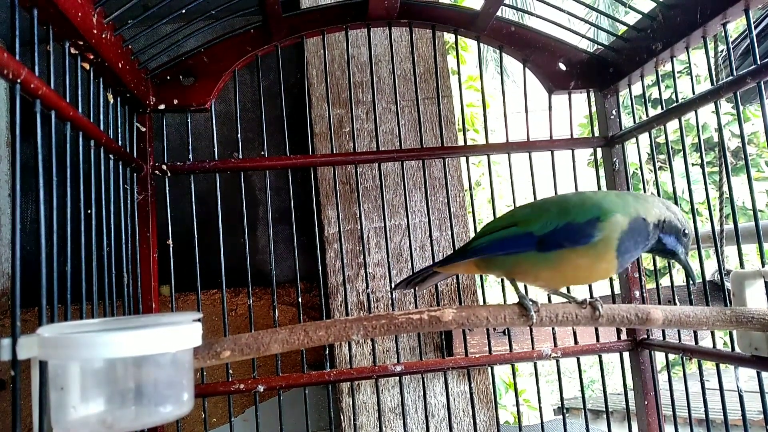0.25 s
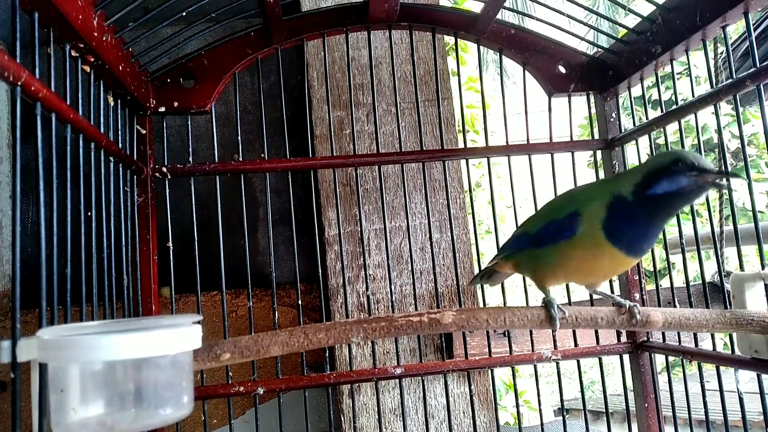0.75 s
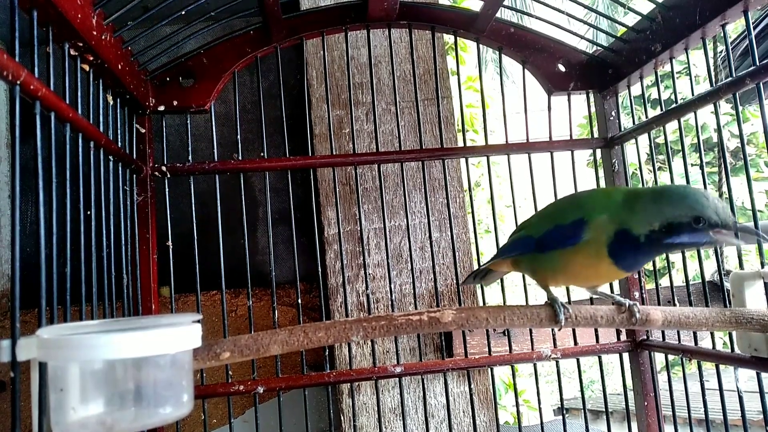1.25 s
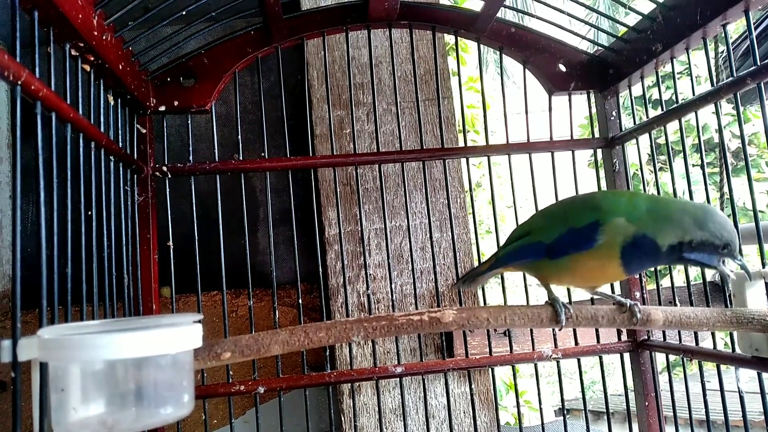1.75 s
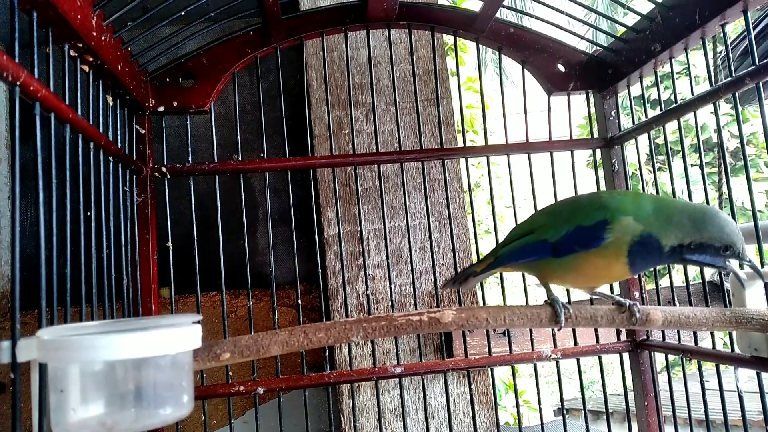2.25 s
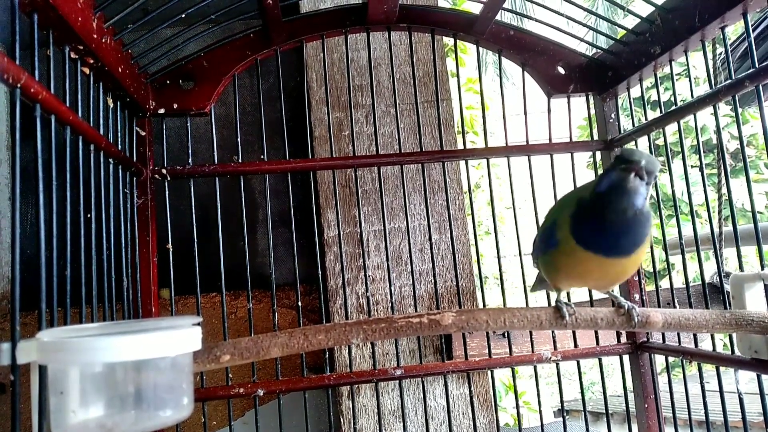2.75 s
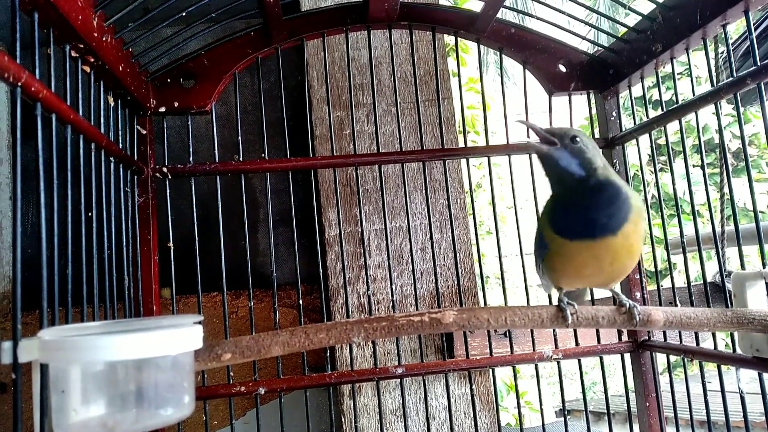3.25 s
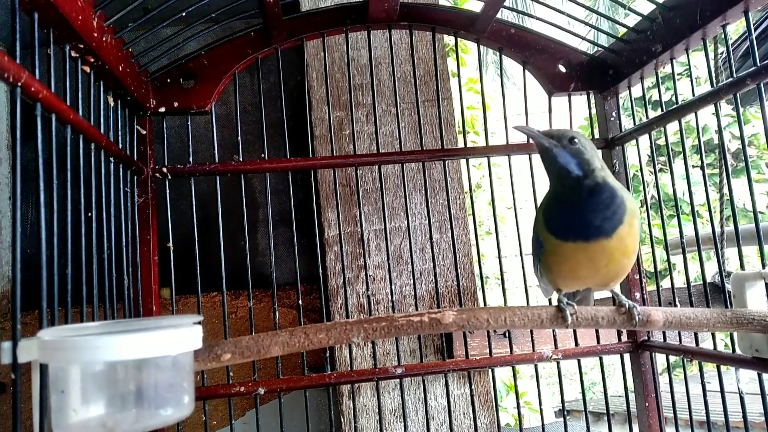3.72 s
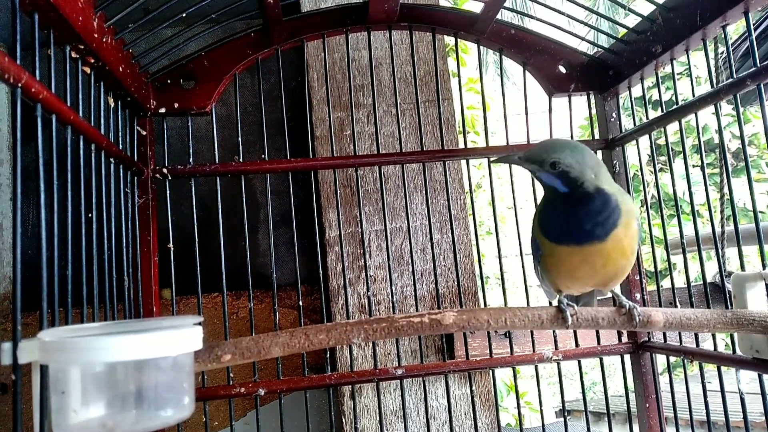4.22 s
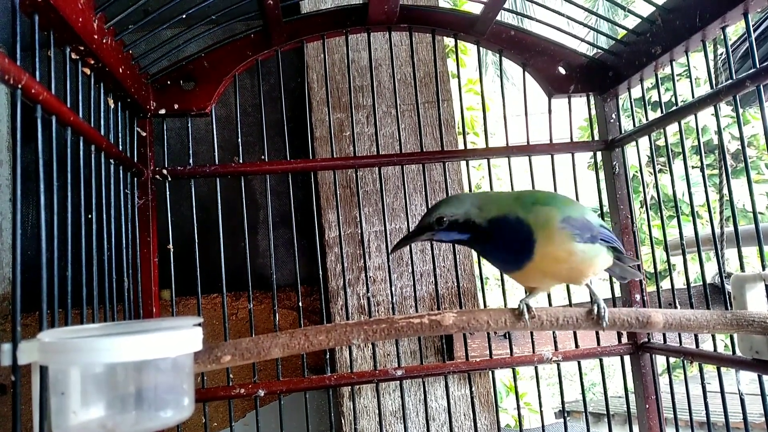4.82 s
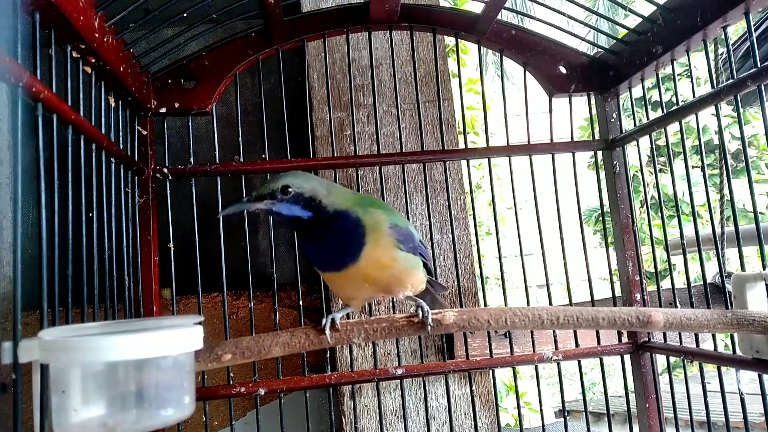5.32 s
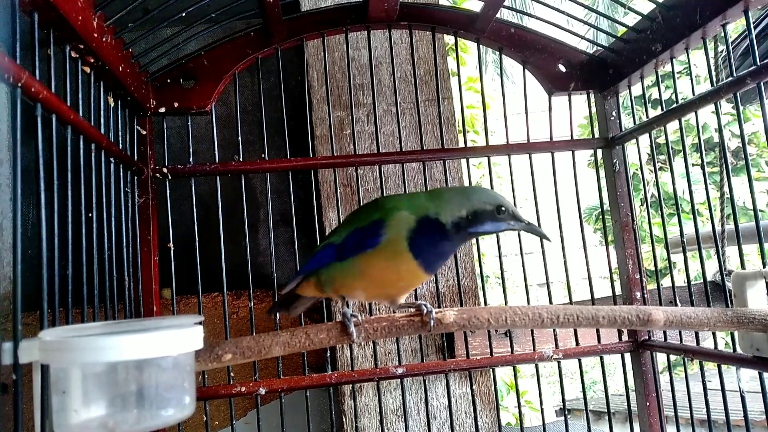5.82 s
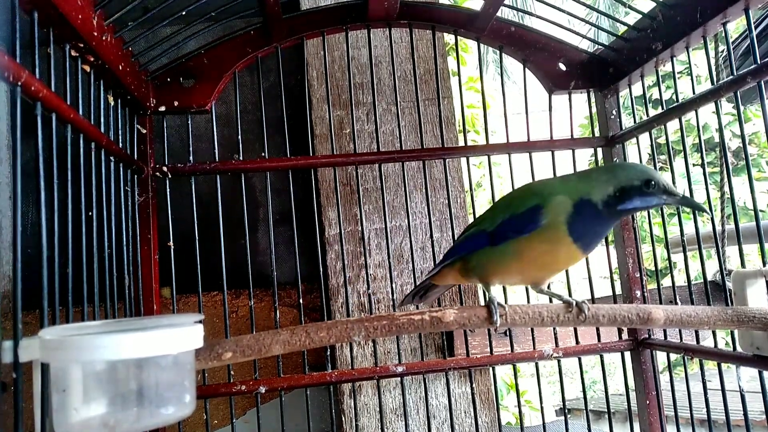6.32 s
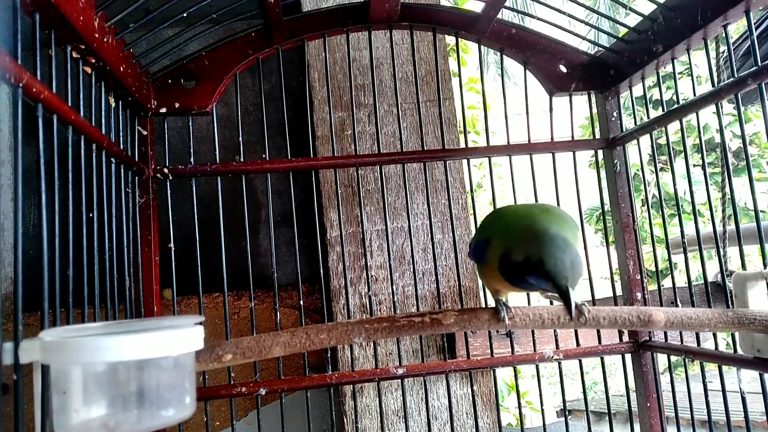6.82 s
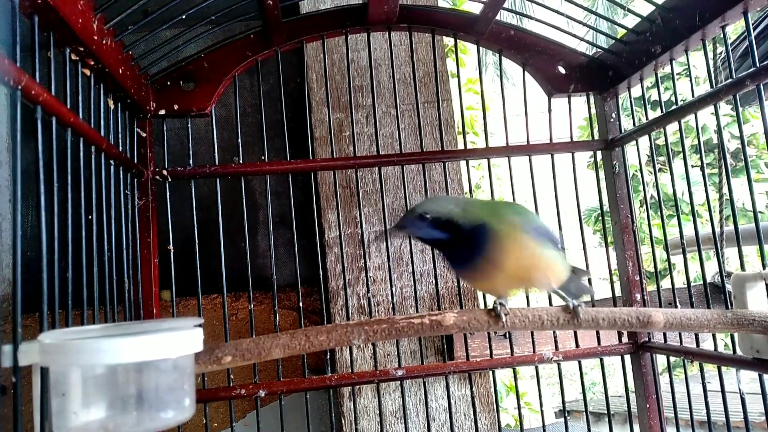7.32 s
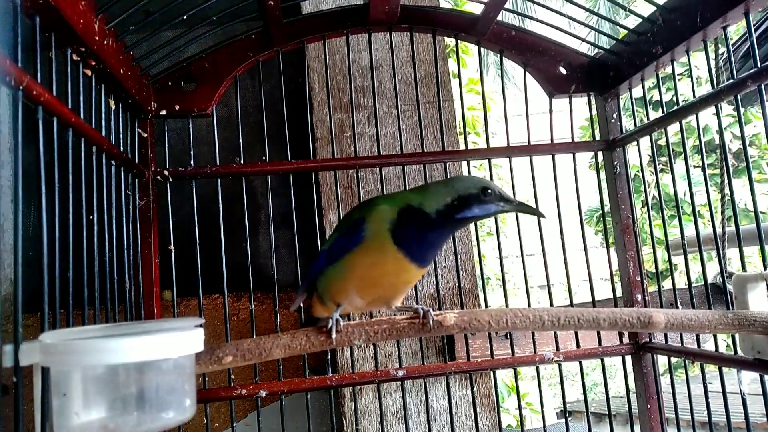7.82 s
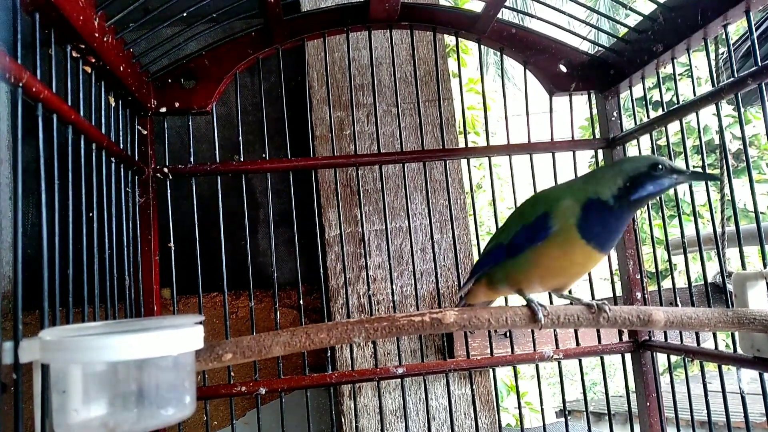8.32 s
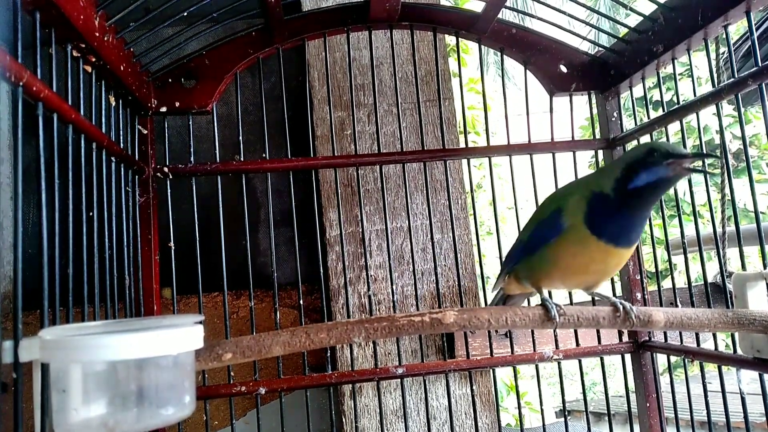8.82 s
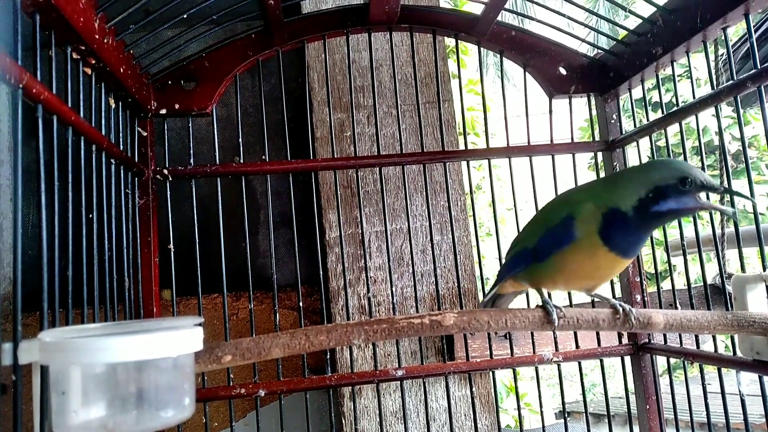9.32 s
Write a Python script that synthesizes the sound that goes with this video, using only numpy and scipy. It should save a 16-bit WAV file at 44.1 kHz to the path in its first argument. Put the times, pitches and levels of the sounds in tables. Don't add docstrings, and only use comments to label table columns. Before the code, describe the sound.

On a semi-enclosed porch, a phone close to a birdcage picks up rasping, buzzy chirps in quick succession, a neighbouring bird's purer whistles, then a quieter stretch of hopping feet, wooden taps, tiny metallic clinks and high dry insect ticks. Two hoarse squawks break in while a far bird warbles with blurred echoes. Traffic swells low, and a final burst of harsh chattering runs to the end.

```python
import sys
import numpy as np
from scipy import signal
from scipy.fft import rfft, irfft
from scipy.io import wavfile
from scipy.ndimage import uniform_filter1d

SR = 44100
rng = np.random.default_rng(int(sys.argv[2]) if len(sys.argv) > 2 else 0)


def master_out(mix):
    frames = np.transpose(np.atleast_2d(mix))
    ceiling = np.clip(frames, -1, 1)
    pcm = np.round(ceiling * 32767).astype(np.int16)
    wavfile.write(sys.argv[1], SR, pcm)


def voltage_ratio(level):
    return 10 ** (np.asarray(level, float) / 20)


N = 421596
TIME = np.arange(N) / SR

# start_s, length_s, level_db
SLOW = [(.98, 0.031, -15.5), (1.074, 0.042, -18), (1.152, 0.04, -17), (1.254, 0.044, -17),
        (1.338, .053, -19.5), (1.432, 0.035, -17)]
RISING = [(1.515, 0.048, -14.5), (1.578, 0.045, -12.5), (1.64, 0.051, -14.5), (1.722, 0.039, -13.5),
          (1.794, 0.037, -13.5), (1.864, 0.037, -14), (1.935, .032, -12), (2.011, 0.021, -10.5),
          (2.079, 0.025, -11.5)]
TURNING = [(2.137, 0.028, -14.5), (2.202, 0.03, -17), (9.005, .029, -14.5), (9.064, 0.044, -16.5)]
FAST = [(2.266, 0.03, -13.5), (2.333, 0.019, -14), (2.391, 0.026, -14), (2.453, .029, -14),
        (2.522, 0.024, -14), (2.586, .025, -14), (2.651, 0.025, -15), (2.716, 0.03, -13.5),
        (2.78, 0.026, -13), (2.844, 0.029, -14), (2.915, 0.03, -13), (2.975, 0.031, -13.5)]
CLOSING = [(3.049, 0.034, -11.5), (3.12, 0.065, -12), (3.195, 0.041, -12), (3.284, 0.03, -12.5),
           (9.12, 0.056, -14)]
AGAIN_FAST = [(8.685, 0.038, -15), (8.748, 0.029, -14), (8.82, 0.025, -16.5), (8.88, 0.033, -16.5),
              (8.943, 0.031, -16)]
AGAIN_RISING = [(9.197, 0.05, -16), (9.268, 0.047, -15.5), (9.342, 0.055, -16.5), (9.418, .039, -14),
                (9.5, 0.042, -15)]


def unit(x):
    return x / np.sqrt(np.mean(x ** 2))


def walk(rate):
    hold = max(int(SR / rate), 2)
    steps = np.repeat(rng.standard_normal(N // hold + 1), hold)
    return unit(uniform_filter1d(uniform_filter1d(steps, hold), hold)[:N])


def noise(points, size=N):
    hz, db = np.transpose(points)
    shape_db = np.interp(np.log(np.fft.rfftfreq(size, 1 / SR) + 1), np.log(hz), db, -99, -99)
    return unit(irfft(rfft(rng.standard_normal(size)) * voltage_ratio(shape_db), size))


def tone(hz, wobble, rate):
    shaken_hz = hz * (1 + wobble * np.clip(walk(rate), -1.7, 1.7))
    return np.sqrt(2) * np.sin(2 * np.pi * np.cumsum(shaken_hz) / SR)


def played(tables, edge_s):
    s, *columns = np.vstack(tables).T
    gate = sum(1. * (TIME >= rows[0][0]) * (TIME < rows[-1][0]) for rows in tables)
    soft_gate = uniform_filter1d(np.minimum(gate, 1), int(edge_s * SR) + 1)
    return [np.interp(TIME, s, column) for column in columns] + [soft_gate]


def notes(rows, peak, start_db, end_db, settle):
    shares = np.array(sorted([0, peak, settle, 1]))
    phrases = []
    for start, length, first_hz, last_hz, db in rows:
        hz = np.interp(shares, [0, settle], [first_hz, last_hz])
        level_db = db + np.interp(shares, [0, peak, 1], [start_db, 0, end_db])
        phrases.append(np.transpose([start + shares * length, hz, level_db]))
    return phrases


def rings(events, cycles, rise_s, length_s=0.22):
    out, t = np.zeros(N + SR), np.arange(int(length_s * SR)) / SR
    for start, hz, db, t60, rough in events:
        grain = uniform_filter1d(rng.standard_normal(len(t)), max(int(SR / hz * cycles), 2))
        grain = uniform_filter1d(grain, max(int(SR / hz * cycles / 2), 2))
        decay = np.minimum(t / rise_s, 1) * voltage_ratio(db - 60 * t / t60)
        shape = decay * ((1 - rough) + rough * unit(grain))
        out[int(start * SR):][:len(t)] += shape * np.sin(2 * np.pi * hz * t)
    return out[:N]


def space(x, near_ms, near_db, t60, tail_db, pan_db, turn=0.73, lag=5):
    t = np.arange(int(.6 * SR)) / SR
    chance = rng.standard_normal((3, 2, len(t)))
    near = chance[:2] * np.exp(-t * 1000 / near_ms)
    near = voltage_ratio(near_db) * near / np.linalg.norm(near, axis=2, keepdims=True)
    tail = chance[2] * voltage_ratio(-60 * t / t60) * np.minimum(t / 0.014, 1)
    still = voltage_ratio(tail_db) * tail / np.linalg.norm(tail[0])
    still[[0, 1], [0, int(lag)]] += 1
    angle = turn * walk(5)
    paths = zip((x, x * np.cos(angle), x * np.sin(angle)), (still, *near))
    heard = sum(signal.fftconvolve(part[None], path, axes=1)[:, :N] for part, path in paths)
    panned = heard * voltage_ratio(np.array([[.5], [-.5]]) * pan_db)
    return panned / np.sqrt(1 + voltage_ratio(2 * near_db) + voltage_ratio(2 * tail_db))


def porch_air():
    # pitch_hz, level_db per Hz
    spectrum = [(150, -21), (250, -2), (638, -1.5), (1660, -12.5), (2600, -10), (4770, -16), (9230, -16),
                (11400, -20.5), (13500, -15), (15800, -32)]
    mid, side = rfft(noise(spectrum)), rfft(noise(spectrum))
    hz, out, swell = np.fft.rfftfreq(N, 1 / SR), 0, walk(1.75)
    for centre in 150 * 2. ** np.arange(7.):
        band = np.clip(1 - abs(np.log2((hz + 1) / centre)), 0, 1)
        apart = min(0.33 + centre / 1800, 1) * np.array([[1], [-1]])
        swell_db = 1.0 * swell + 1.3 * walk(5) + 2 * walk(12)
        out = out + voltage_ratio(swell_db) * irfft(band * (mid + apart * side), N)
    return voltage_ratio(-51) * unit(out)


def traffic():
    # start_s, level_db
    boom_course = [(0.0, -51), (0.16, -47), (1.54, -52.5), (3.8, -47.5), (3.86, -47), (4.07, -74),
                   (4.15, -45), (6.23, -55), (6.63, -45.5), (7.35, -48.5), (7.61, -37), (8.23, -42.5),
                   (8.44, -40.5), (9.56, -48.5)]
    # pitch_hz, width_hz, level_db
    room_modes = [(71.4, 24, -6.5), (100.4, 12.8, 4), (126, 8.2, 2), (55, 56, -35), (180.4, 121, -11.5)]
    # start_s, pitch_hz, level_db
    engine = [(7.45, 111.2, -50), (7.68, 112.9, -32.5), (7.85, 121.4, -42), (8.25, 126, -44),
              (8.5, 128.4, -32), (8.9, 125.4, -41.5), (9.25, 119, -45.5)]
    spectrum = 0
    for mode_hz, width_hz, db in room_modes:
        detuning = (np.fft.rfftfreq(N, 1 / SR) - mode_hz) / width_hz * 2
        spectrum = spectrum + voltage_ratio(db) / (1 + detuning ** 2) * rfft(rng.standard_normal(N))
    boom = unit(irfft(spectrum, N)) * voltage_ratio(np.interp(TIME, *np.transpose(boom_course)) + 2.2 * walk(9))
    hum_hz, hum_db, gate = played([engine], .05)
    boom += gate * voltage_ratio(hum_db) * tone(hum_hz, 0.02205, 13)
    return np.array([boom, np.roll(boom, 12)]) * voltage_ratio(np.array([[-1.5], [1.5]]))


def far_warbler():
    # start_s, length_s, first_hz, last_hz, level_db
    warble = [(0, 0.11, 3454, 3570, -35), (.16, 0.15, 3616, 2783, -38), (.415, 0.095, 3430, 3645, -33),
              (.51, 0.14, 3580, 3720, -42.5), (5.55, 0.05, 3120, 2770, -51), (5.78, .12, 2445, 3230, -45),
              (6.28, .1, 2816, 2610, -46.5), (6.42, 0.071, 2720, 3190, -44.5),
              (6.78, 0.11, 3507, 3570, -35), (6.87, 0.08, 3480, 2810, -31),
              (7.16, 0.076, 3070, 3256, -33.5), (7.25, 0.091, 3470, 3860, -34),
              (7.33, 0.11, 3940, 3350, -35.5), (7.45, 0.12, 2970, 2803, -36),
              (7.62, 0.065, 3090, 3410, -33.5), (7.69, 0.11, 3500, 3950, -32),
              (7.79, 0.058, 3890, 2820, -38), (8, 0.073, 3190, 3240, -34), (8.11, 0.044, 2910, 2630, -36),
              (8.26, 0.15, 3067, 3453, -34), (8.4, 0.076, 3410, 2952, -34)]
    hz, db, gate = played(notes(warble, peak=0.22, start_db=-2.5, end_db=-13, settle=0.46), 0.005)
    dry = gate * voltage_ratio(db + 2.5 * walk(40)) * tone(hz, .019, 250)
    return space(dry, 23, 1.2, 0.67, 0.9, 0.36, turn=1.62)


def insect():
    # start_s, peak_db
    ticks = [(0.149, -37), (0.359, -36), (0.5691, -34), (3.4411, -42), (3.6431, -42), (3.8397, -36),
             (4.0412, -41), (4.2482, -37), (4.4583, -40), (4.6663, -37), (4.871, -39), (5.0814, -36),
             (5.2859, -38), (5.4934, -35), (5.692, -37), (5.911, -37), (6.1235, -38.5), (6.335, -41),
             (6.5415, -35), (6.7501, -36), (7.163, -33), (7.3736, -31.5), (7.5867, -36), (7.7847, -34),
             (7.9922, -36), (8.2092, -37), (8.4208, -37)]
    # pitch_hz, level_db
    wing = [(13600, 6.5), (14600, -3)]
    buzz = 0.85 + 0.15 * np.sin(2 * np.pi * 190 * TIME)
    events = [(s - .006, hz, db + wing_db + 2, .12, .8) for s, db in ticks for hz, wing_db in wing]
    return space(buzz * rings(events, 11, .014), 2.2, 13.0, 0.16, -42, 4.6, turn=2.2)


def perch_knocks():
    # (relative to the peak, at 2.5, 5 and 9 kHz)
    knocks = [(0.15, -40, 1510, -5), (0.352, -43.5, 2840, 11), (0.474, -30, 860, -7.5),
              (3.414, -33, 2050, -6), (3.545, -31.5, 1360, -11), (3.579, -31.5, 617, -13),
              (3.765, -36.5, 315, -8), (3.983, -39, 370, -20), (4.311, -32.5, 945, -8),
              (4.629, -35, 843, -14), (5.049, -32.5, 630, -13), (5.078, -30, 928, -3.5),
              (5.108, -32.5, 2596, -4.5), (5.14, -47, 2460, -20), (5.443, -39, 1180, -2.5),
              (5.466, -35, 359, -5), (5.474, -37, 2220, -15), (5.633, -40, 1895, -4),
              (5.655, -40, 1990, -8), (5.619, -36, 615, 1.5), (5.674, -36, 393, -24),
              (5.814, -35.5, 657, -1), (5.848, -36, 905, -4), (5.972, -30, 363, -25),
              (6.221, -32.5, 594, -15), (6.331, -34, 399, 5), (6.539, -22, 2870, -16),
              (7.19, -40, 1540, 6.5), (7.284, -38, 2220, 2), (7.384, -35.5, 910, -0.5),
              (7.776, -29, 1305, -2), (7.862, -35, 900, 3), (7.934, -28.5, 2240, -6),
              (8.054, -35.5, 500, 7.5), (8.16, -36, 1305, -2)]
    main = [(s, hz, db - 1, .1, .6) for s, db, hz, _ in knocks]
    body = [(s, 1100, db - 5, .09, .9) for s, db, *_ in knocks]
    scrapes = [(s, hz, db + up_db - 4.5, .09, 1) for s, db, _, up_db in knocks for hz in (2500, 5000, 9000)]
    return rings(main + body, .8, .003) + rings(scrapes, 1.05, 0.0053)


def bright_clinks():
    # start_s, peak_db, upper_modes_db
    clinks = [(3.4141, -60, -44), (3.645, -33, -1), (4.0412, -24.5, -10), (4.8788, -39, -26.5),
              (5.2859, -47, -24), (5.694, -44, -14), (5.9105, -31.5, -6.5), (6.3305, -71, -33)]
    # pitch_hz, level_db, t60_s
    clink_modes = [(5685, 9, 0.03), (6960, 4, 0.064), (7500, -7, 0.13), (11100, -4, 0.066)]
    events = [(s, hz, db + mode_db + (hz > 6000) * up_db, t60, .75)
              for s, db, up_db in clinks for hz, mode_db, t60 in clink_modes]
    return rings(events, 12, .005)


def knocks_and_clinks():
    return space(perch_knocks() + bright_clinks(), 1.6, 0.54, 0.17, -2.3, 0.47)


def neighbour_whistles():
    # start_s, length_s, first_hz, last_hz, level_db
    whistles = [(.535, 0.1, 2510, 2508, -35.5), (1.02, 0.061, 2557, 2539, -29),
                (1.08, 0.082, 1804, 1943, -14.5), (1.2, 0.069, 1950, 1900, -10.5),
                (1.322, 0.081, 1916, 1848, -14.5), (1.5, 0.08, 1874, 1776, -15.5)]
    hz, db, gate = played(notes(whistles, peak=0.69, start_db=-9.5, end_db=-9.5, settle=.9), 0.02)
    dry = gate * voltage_ratio(db - 1.5 + 1.5 * walk(70)) * tone(hz, .008, 150)
    return space(dry, 3, -7, .2, -13, 6)


def voice(throat_hz, low_hz, low_db, treble_db, treble, wobble, rasp_db, octave_db):
    # pitch_hz, level_db per Hz
    rasp = [(530, -61), (900, -31.5), (1280, -26), (1610, -40.5), (1850, -10.5), (3020, 2), (4330, -1.5),
            (5200, -21), (6760, -33), (11400, -120)]
    flutter = unit(voltage_ratio(1.2 * walk(350) + 1.8 * walk(1100) + 3 * tone(170, .2, 60)))
    upper = tone(throat_hz, wobble, 700) + voltage_ratio(-22) * tone(2 * throat_hz, wobble, 700)
    lower = voltage_ratio(low_db) * np.minimum(low_hz / 1700, 1) ** 4.5 * tone(low_hz, 1.3 * wobble, 610)
    lower += voltage_ratio(low_db + octave_db) * tone(2 * low_hz, wobble, 650)
    breath = voltage_ratio(rasp_db) * noise(rasp) + voltage_ratio(treble_db + 1.47 * walk(40)) * noise(treble)
    return flutter * (upper + lower) + np.sqrt(flutter) * breath


def slurs(crest):
    # start_s, length_s, level_db, dip_hz
    opening = [(0.651, 0.035, -18.5, 3074), (0.686, 0.047, -15, 2700), (0.733, 0.056, -16, 3354),
               (0.786, 0.058, -17, 2704), (0.837, 0.057, -16, 3142), (0.892, 0.052, -15, 2910),
               (8.532, .028, -21, 3645), (8.563, 0.065, -16, 2750), (8.623, 0.051, -15.5, 2605)]
    posture = (0, -10.5, -2, 0, -0.0843)
    rise_hz_per_s, top_hz, last_hz = 62000, 5138, 1951
    ends = [b[3] if b[0] - a[0] < .1 else last_hz for a, b in zip(opening, opening[1:])] + [last_hz]
    rows = []
    for (start, length, db, dip), end in zip(opening, ends):
        crest_hz = min(dip + rise_hz_per_s * crest * length, top_hz)
        rows.append((start, length, db, (dip, crest_hz, end), posture, True))
    return rows


def plunges(rows):
    # start_s, length_s, first_hz, last_hz, level_db
    hooks = [(3.15, 0.023, 1700, 1035, -30.5), (3.172, 0.025, 1020, 2353, -27),
             (8.55, .04, 1496, 1387, -28.5)]
    falls = [(s + length - .012, 0.018, 2103, 900, db - 22)
             for s, length, db, *_, slurred in rows if not slurred]
    phrases = notes(sorted(hooks + falls), peak=0.25, start_db=-11, end_db=-5.2, settle=0.76)
    hz, db, gate = played(phrases, 0.0038)
    return gate * voltage_ratio(db) * tone(hz, 0.01136, 600)


def song():
    # (top_hz of the lower voice, low_db, treble_db, pan_db (left minus right), wobble share)
    phrases = [(SLOW, (4150, 3900, 4120), (2640.5, -13, -0.5, 0, 0.22)), (RISING, (2850, 3100, 3500),
               (2440, -19, -9.5, 0.3, 0.1)), (TURNING, (4050, 3050, 3200), (2400, -22.5, -4, 0, 0.2654)),
               (FAST, (4450, 4330, 3900), (2261, -13, -9, 0, 0.1041)), (CLOSING, (3900, 3650, 3430),
               (2299.5, -22.5, -12.5, 0.5, 0.07)), (AGAIN_FAST, (3800, 3300, 3600),
               (2399.5, -14, -2.5, -0.5, 0.2)), (AGAIN_RISING, (3100, 3450, 3500),
               (2400.5, -33, -8.5, 0.25, 0.21))]
    # pitch_hz, level_db per Hz
    treble = [(2820, -14), (4600, -6), (5300, -5), (5800, -7), (6510, -12.5), (7560, -8.5), (8560, -16),
              (9690, -12.5), (11500, -24.5), (12600, -23), (13800, -42)]
    # pitch_hz, level_db per Hz
    sheen = [(11500, -30), (13000, -22), (14300, 10), (15200, 9), (15800, -15)]
    crest = .72
    gain, throat, low, wobble = np.zeros(N), np.full(N, 3500.), np.full(N, 2300.), np.zeros(N)
    low_db, treble_db, pan_db, legato = np.zeros((4, N))
    detached = [(*row, glide, posture, False) for table, glide, posture in phrases for row in table]
    rows = sorted(slurs(crest) + detached)
    for (start, length, db, hz, posture, slurred), chance in zip(rows, rng.standard_normal((len(rows), 3))):
        first = int((start - (0 if slurred else .008)) * SR)
        now = slice(first, min(int((start + length + .04) * SR), N))
        t = TIME[now] - start
        late = np.maximum(t - length, 0)
        top_hz, low_db[first:], treble_db[first:], pan_db[first:], shake = posture
        legato[first:] = slurred
        wobble[first:] = min(shake, .02 if slurred else .07)
        shares = [.08, crest, .95] if slurred else [.05, .5, .95]
        scatter = 1 + .03 * chance * (not slurred)
        throat[now] = np.interp(t / length, shares, hz * scatter)
        arch = np.interp(t / length, [0, .45, .8, 1.05, 1.3], [.82, 1, .9, .62, .45])
        low[now] = throat[now] / 2 if slurred else top_hz * arch
        throat[now] *= 1 - 4 * late
        fade = np.clip(t / .013 + (.4 if slurred else .65), 0, 1) ** 1.5 * voltage_ratio(-750 * late)
        gain[now] = np.maximum(gain[now], voltage_ratio(db) * fade)
    throat, low = [uniform_filter1d(hz, 300) for hz in (throat, low)]
    dim_db = 6 * np.maximum(abs(throat - 3880) - 550, 0) / 1000 * legato
    dry = gain * voltage_ratio(-dim_db) * voice(throat, low, low_db + dim_db, treble_db + dim_db, treble,
                                      wobble=wobble, rasp_db=-10.5, octave_db=np.where(legato, -20, -1))
    dry += gain * voltage_ratio(-36.5 - .8 * treble_db + 1.5 * walk(30)) * noise(sheen)
    dry += plunges(rows)
    return space(dry, 3.5, -2, 0.21, -10.5, pan_db, turn=2.6, lag=4)


def screech():
    # start_s, length_s, level_db, extra_treble_db
    screeches = [(6.548, .237, -15, -0.5), (6.93, .16, -16, 4.5)]
    # share of its length, throat_hz, low_hz, low_db, treble_db
    call_course = [(0, 2698, 1004, -11, -19.5), (.16, 3302, 2080, -12, -10), (0.419, 3720, 2527, -1, -5),
                   (.67, 3100, 2567, -1, -13), (1.001, 2900, 2431, -1, -16)]
    # pitch_hz, level_db per Hz
    shriek = [(2820, -8.5), (4800, -12), (5980, -23), (8560, -17), (11300, -19), (12800, -13), (14600, -47),
              (14800, -77), (15800, -80)]
    attack_s, release_s, edge_db = 0.025, 0.05, -13
    share, *course = np.transpose(call_course)
    tables, corners = [], []
    for start, length, db, up_db in screeches:
        tables.append(np.transpose([start + share * length, *course[:3], course[3] + up_db]))
        corners += [(start, db + edge_db), (start + attack_s, db)]
        corners += [(start + length - release_s, db), (start + length, db + edge_db)]
    throat, low, low_db, treble_db, gate = played(tables, 0.0018)
    db = np.interp(TIME, *np.transpose(corners))
    upper_share = np.sqrt(np.clip(1 - voltage_ratio(2 * low_db), .08, 1))
    lift_db = -20 * np.log10(upper_share)
    dry = voice(throat, low, low_db + lift_db, treble_db + lift_db, shriek,
                wobble=.052, rasp_db=-8, octave_db=-20)
    return space(gate * voltage_ratio(db + 1.5) * upper_share * dry, 5, -1, .22, -8, 2.5, turn=2.5)


def scene():
    background = porch_air() + traffic()
    small_sounds = insect() + knocks_and_clinks()
    birds = far_warbler() + neighbour_whistles() + song() + screech()
    return background + small_sounds + birds


def band_limit(x):
    return signal.sosfilt(signal.butter(12, 15750, fs=SR, output="sos"), x)


def record(dry):
    rounded = np.tanh(1.15 * dry) / 1.15
    return band_limit(rounded)


dry = scene()
out = record(dry)
master_out(out)
```